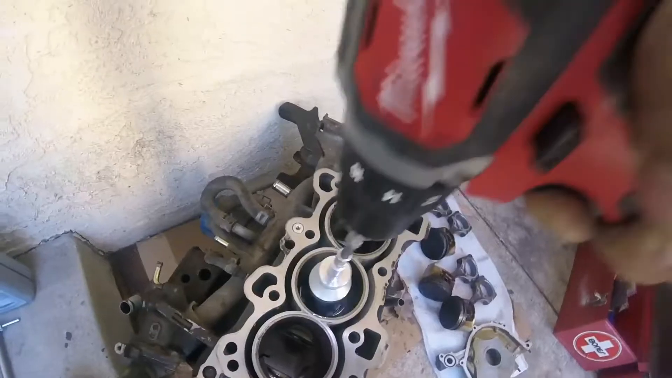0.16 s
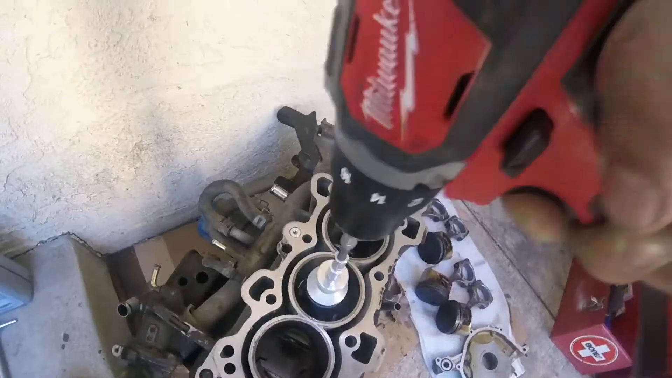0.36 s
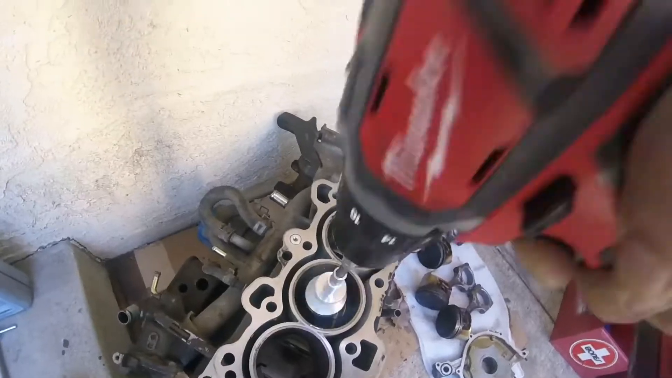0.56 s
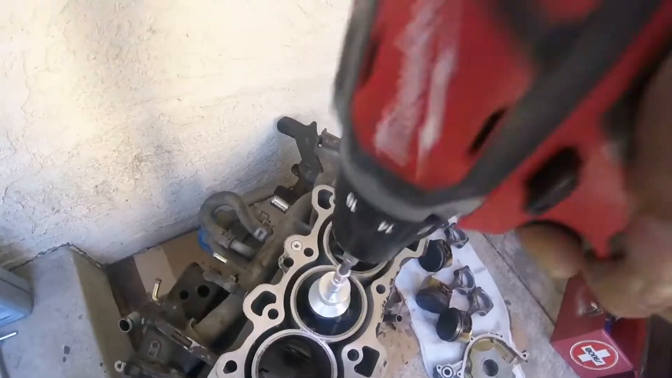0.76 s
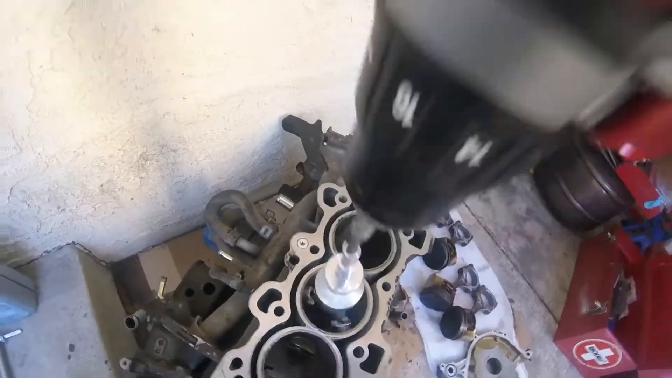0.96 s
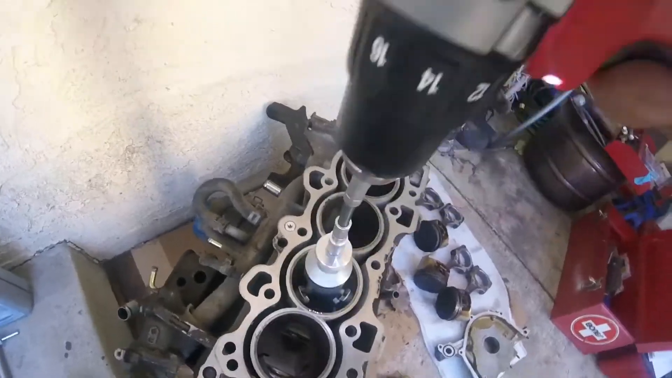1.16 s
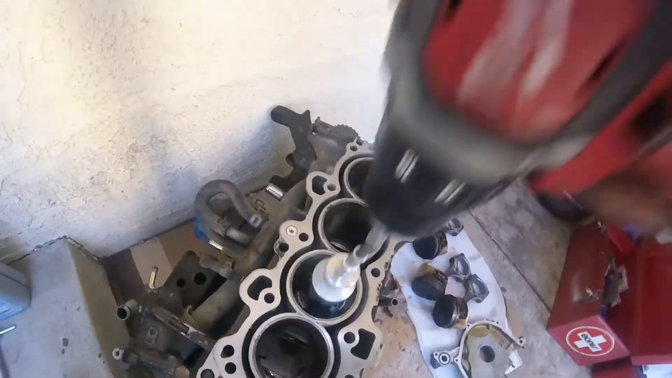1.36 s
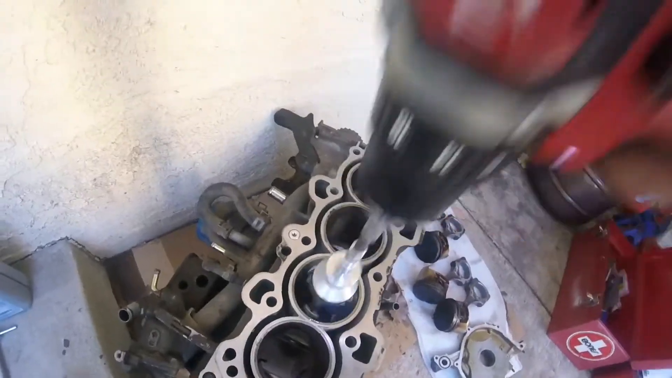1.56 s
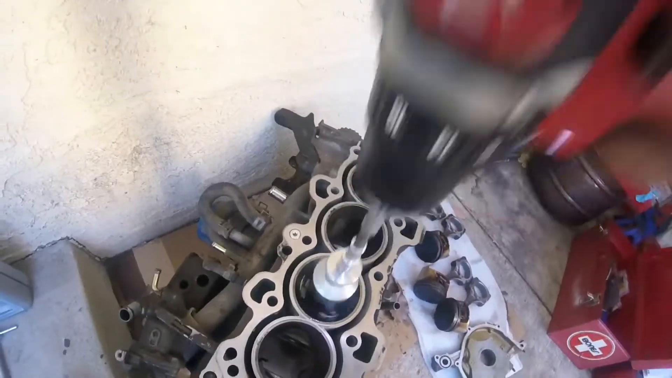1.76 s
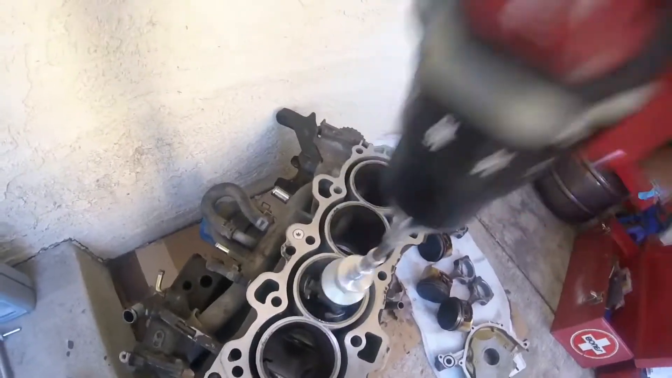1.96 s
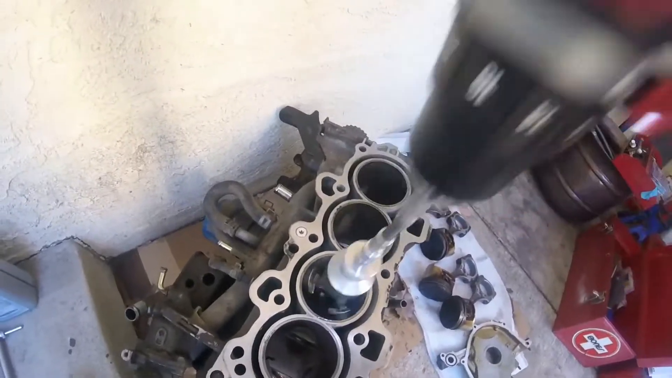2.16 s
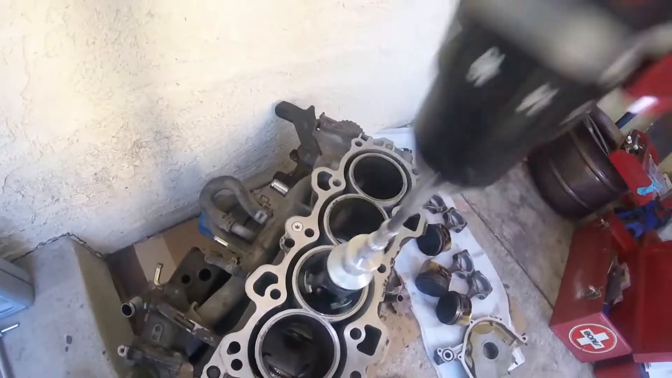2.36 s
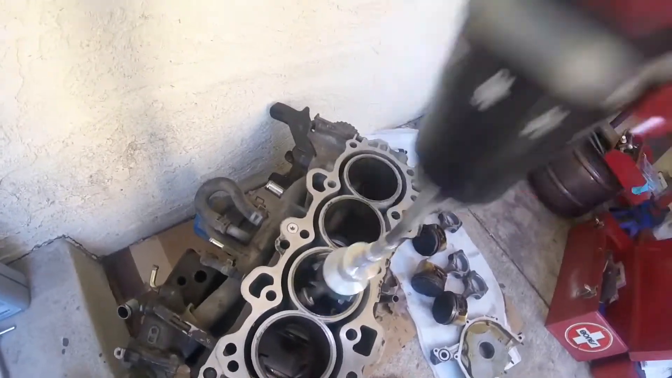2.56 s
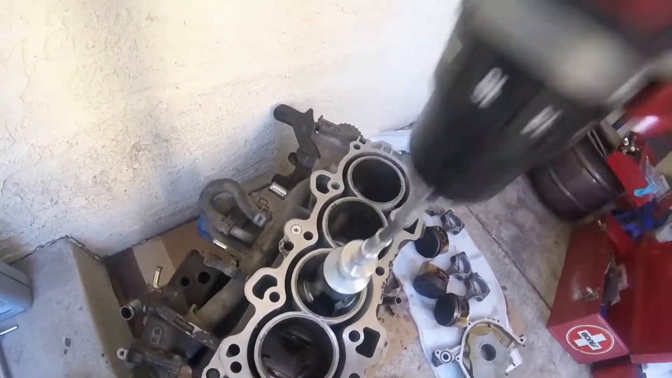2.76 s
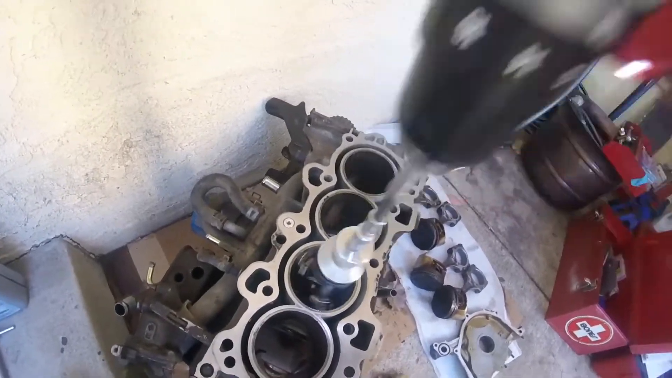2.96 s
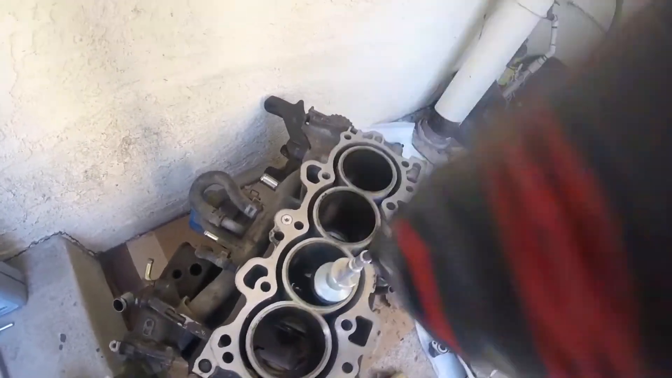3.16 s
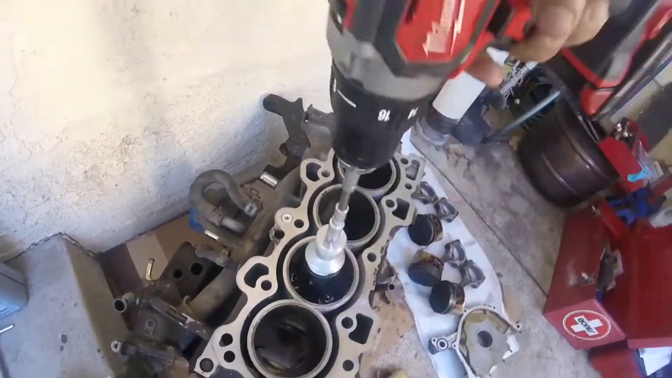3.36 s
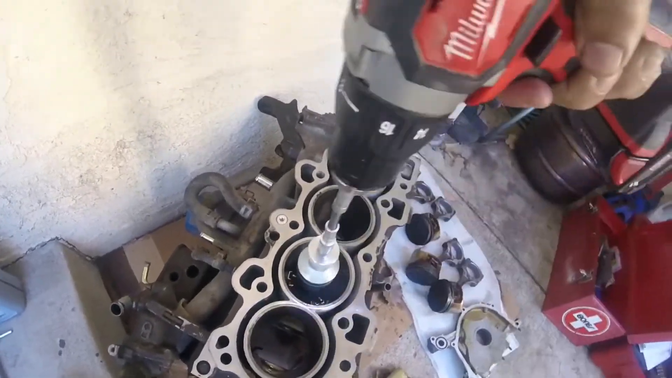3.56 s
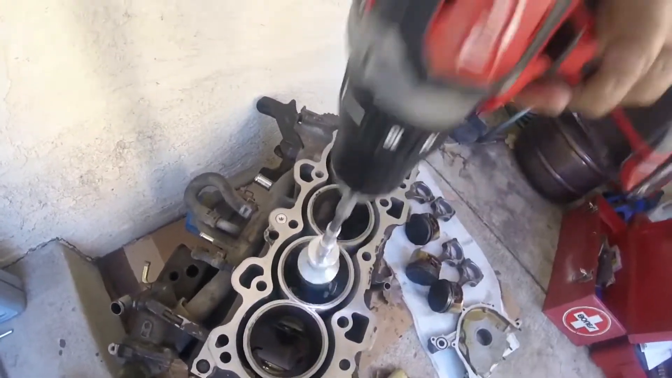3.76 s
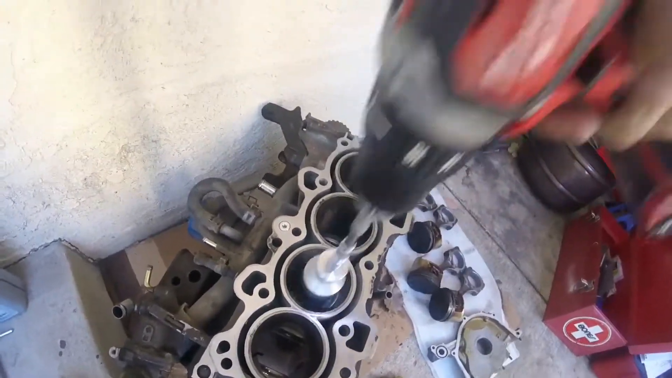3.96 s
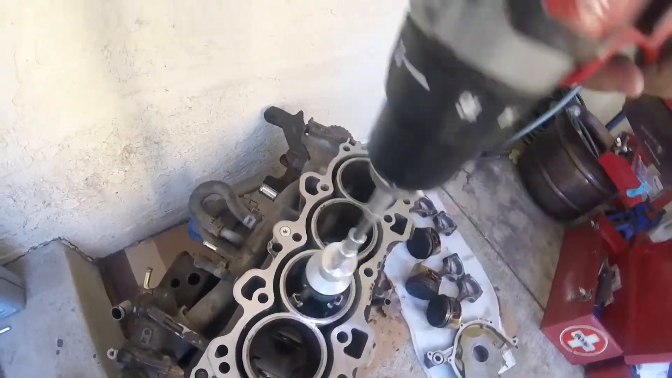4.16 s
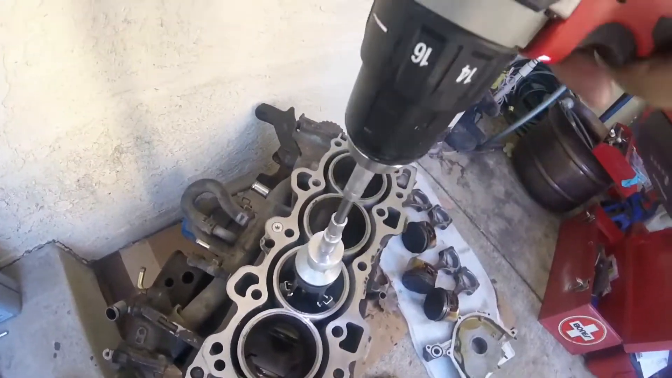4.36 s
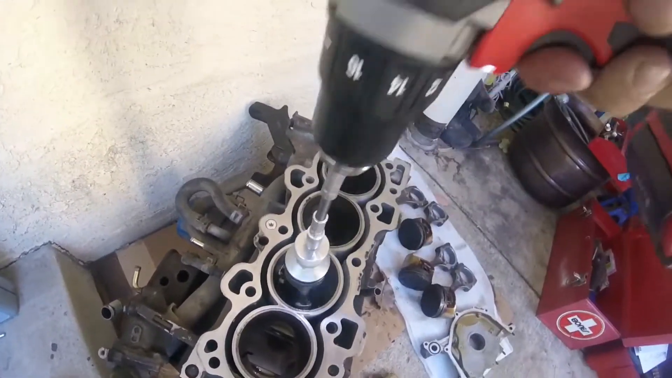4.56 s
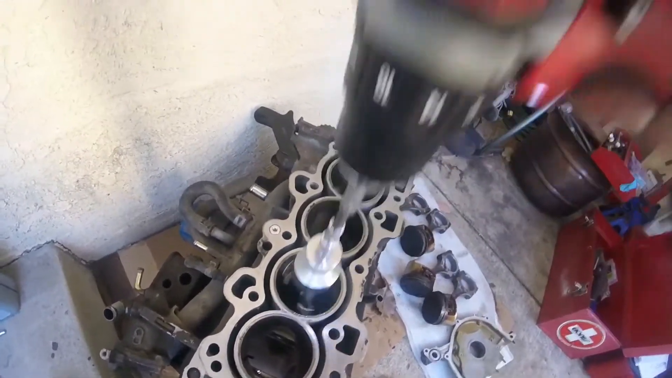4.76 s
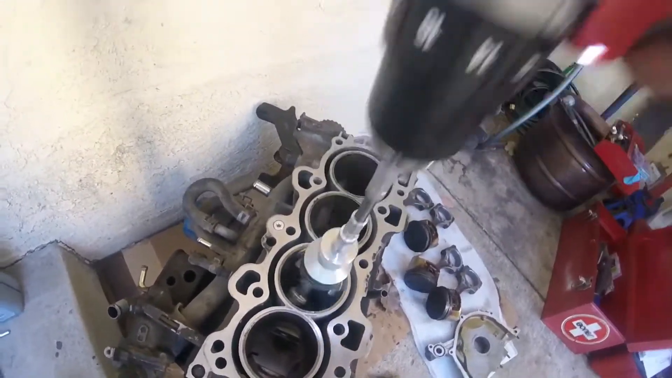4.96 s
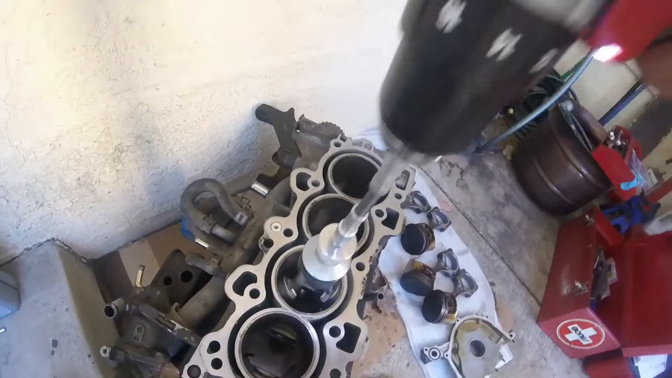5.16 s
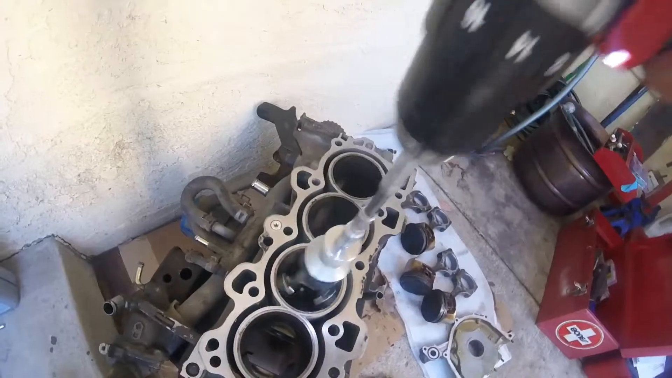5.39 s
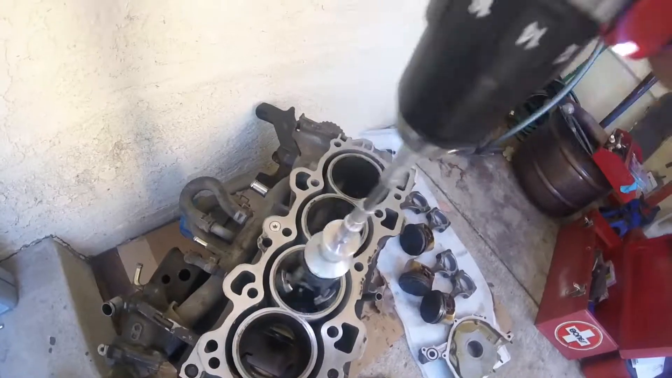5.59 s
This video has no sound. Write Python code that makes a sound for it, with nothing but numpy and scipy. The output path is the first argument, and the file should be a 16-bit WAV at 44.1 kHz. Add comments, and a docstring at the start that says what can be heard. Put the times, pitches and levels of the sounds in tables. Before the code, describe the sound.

A cordless drill is already running, close to the microphone in a workshop with little echo, spinning a hone inside an engine cylinder. Its whine wavers in pitch about five times a second with the strokes, along with pulsing gear rattle and the gritty scrape of stones on metal. Just before 1 second, steel clacks and the motor cuts out for an instant. It restarts at 1.2 seconds, knocks sharply at 1.4, and keeps working until it stops with a clack around 3.1. The hone slides and knocks in the bore with a short metallic ring. From 3.6 seconds the drill turns slower and lower, and the engine block hums briefly, ending in more clacks at 4.1. After a quiet half second, the drill returns to full speed at 4.6 and runs until the end, around 5.6. Low handling rumble and faint room tone continue underneath.

```python
"""A cordless drill spins a hone up and down an engine cylinder, close to the microphone in a workshop.
The gears whine and rattle as the speed swings with each stroke, and the stones scrape the bore.
The trigger is let go three times: the drive stops with a clack and the hone knocks in the cylinder.
Underneath, the block hums and the hand-held drill rumbles over faint room tone; the walls are near."""
import sys
import numpy as np
from scipy import signal
from scipy.fft import rfft, irfft, next_fast_len
from scipy.io import wavfile
from scipy.ndimage import map_coordinates

SR = 44100
rng = np.random.default_rng(int(sys.argv[2]) if len(sys.argv) > 2 else 0)


def unload_audio(sound):
    """Save the sound as a 16-bit wav file, at the path given as the first command line argument."""
    columns = np.transpose(np.atleast_2d(sound))
    # keep every value between -1 and 1, then stretch to whole-number steps
    steps = np.round(np.clip(columns, -1, 1) * 32767)
    wavfile.write(sys.argv[1], SR, steps.astype(np.int16))


N = 248150
TIME = np.arange(N) / SR

# strokes of the hone, from the free-running moment on; shaft speeds hold for a full trigger:
# start_s, free_turns_per_s, biting_turns_per_s, drive_db, rattle_db, scrape_db
STROKES = [(-0.18, 158, 128, -23, -30, -31), (0.05, 170, 118, -38, -28.5, -33),
           (0.265, 157, 119, -38, -31, -30), (0.485, 159, 113.6, -37, -27, -31.5),
           (0.7, 136, 112, -39.5, -32.5, -30), (0.895, 149, 130, -37, -27.5, -31),
           (0.985, 135, 128, -39.5, -29.5, -33), (1.225, 128, 138, -35.5, -30.5, -29),
           (1.306, 135, 131, -37.5, -45, -33), (1.43, 141, 97.4, -43.5, -36.5, -35.5),
           (1.65, 122, 103, -45.5, -38, -35), (1.84, 134, 109, -42.5, -35, -34.5),
           (2.025, 143, 106.6, -41.5, -32, -34.5), (2.215, 147, 102.5, -43, -31.5, -34),
           (2.415, 134, 100.3, -43.5, -31.5, -33.5), (2.625, 140, 113, -41.5, -30, -33.5),
           (2.82, 155, 128, -40, -32, -32), (3.0, 164, 121, -40, -28.5, -33.5),
           (3.17, 128, 127, -41, -43, -33), (3.769, 112, 110, -49, -42.5, -36.5),
           (3.935, 143, 123, -41.5, -33.5, -32), (4.67, 143, 135, -41.5, -43, -35),
           (4.79, 139, 131.6, -45, -36, -37), (5.01, 132.5, 123, -43, -32.5, -34.5),
           (5.21, 147, 135, -43.5, -31.5, -37), (5.4, 132, 123.5, -42.5, -32, -36),
           (5.62, 132, 128, -43, -27.5, -34.5)]
# spectrum of hard contact in the bore: frequency_hz, gain_db
CONTACT_SPECTRUM = [(1000, -40), (3000, -20), (5000, 2.5), (5900, -3.5), (6900, 1), (7600, -1.5),
                    (8500, -0.5), (9500, 3.5), (10500, 2), (12000, 0), (14000, -9)]


def from_db(db):
    """Decibels to gain."""
    return 10 ** (np.asarray(db) / 20)


def rms_one(x):
    """Scale to unit rms."""
    return x / np.sqrt(np.mean(x ** 2) + 1e-20)


def in_time(rows):
    """Rows of (time_s, values...) as one curve per value, sample by sample."""
    times, *columns = np.transpose(rows)
    return [np.interp(TIME, times, column) for column in columns]


def drift(rate):
    """Smooth random wander with about `rate` new values a second; rms 1."""
    return rms_one(map_coordinates(rng.standard_normal(N // 8), [TIME * rate], order=3, mode="wrap"))


def shaped(x, spectrum):
    """Pass x through a response given as rows of (frequency_hz, gain_db)."""
    hz, db = np.transpose(spectrum)
    size = next_fast_len(N)
    bins = np.maximum(np.fft.rfftfreq(size, 1 / SR), 1)
    response = from_db(np.interp(np.log(bins), np.log(hz), db))
    return irfft(rfft(x, size) * response, size)[:N]


def colour(x, spectrum):
    """Give x a spectrum; rms 1."""
    return rms_one(shaped(x, spectrum))


def grains(per_s, spread_db):
    """Random tiny impacts of uneven size; rms 1."""
    sizes = from_db(spread_db * np.minimum(rng.exponential(1, N), 4)) * rng.choice([-1, 1], N)
    return rms_one(sizes * (rng.random(N) < per_s / SR))


def room_tone(level_db):
    """The faint, steady background of the workshop."""
    # spectrum of the quiet room: frequency_hz, gain_db
    spectrum = [(20, -18), (60, 5), (300, -7), (500, -19), (800, -13.5), (1300, -10), (2300, -16),
                (12000, -41)]
    return from_db(level_db) * colour(rng.standard_normal(N), spectrum)


def near_walls(x, t60_s):
    """A short diffuse tail from the walls, reaching the microphone 4 ms after the direct sound."""
    age = TIME[:SR // 2]
    tail = rng.standard_normal(len(age)) * from_db(-60 * age / t60_s) * (age > .004)
    return signal.fftconvolve(x, tail / np.linalg.norm(tail))[:N]


def handling_rumble(gain_db, lumpy_db):
    """Low, lumpy shaking of the hand-held drill and the block."""
    # strength of the shaking: time_s, level_db
    handling = [(0, -41), (0.96, -39), (1.35, -39.5), (1.55, -46.5), (1.9, -42), (2.95, -43.5), (3.16, -39),
                (3.5, -40.5), (3.85, -38.5), (4.2, -50.5), (4.6, -45), (5.62, -44.5)]
    # its spectrum: frequency_hz, gain_db
    spectrum = [(15, -46), (28, -3), (42, -6), (55, 3.5), (75, -7.5), (98, -5.5), (145, 0.5), (205, 1.5),
                (245, -12.5), (285, -7.5), (350, -14.5), (700, -19.5), (2000, -44)]
    level = from_db(in_time(handling)[0] + gain_db + lumpy_db * drift(25))
    return level * colour(rng.standard_normal(N), spectrum)


def block_hum():
    """Stone friction sets the low resonances of the engine block going."""
    # the hum rises when the stones drag slowly: time_s, level_db
    drag = [(0, -57), (3.1, -73), (3.5, -56.5), (3.8, -55), (3.97, -44.5), (4.08, -44.5), (4.2, -63),
            (4.6, -65), (5.63, -60)]
    # resonances of the block: frequency_hz, gain_db
    resonances = [(200, -30), (265, -14), (292, -2), (325, -20), (460, -19), (490, -6), (507, 0), (525, -6),
                  (560, -19), (900, -45)]
    return from_db(in_time(drag)[0]) * colour(rng.standard_normal(N), resonances)


def steel_ring(force, shifting_db=5.5):
    """The ring of hone and liner; the modes swell and fade as the contact points move."""
    # modes of the steel hone and cylinder liner: pitch_hz, level_db, t60_s
    modes = [(2750, -6, .035), (4090, -4, .06), (4265, -4, .05), (5020, -5, .04), (5230, -5, .05),
             (6430, -3, .025), (6950, -2, .025), (8310, -2, .045), (8550, -1, .03), (9230, -2, .018),
             (10980, -5, .012)]
    ring = 0
    for hz, db, t60 in modes:
        r, w = from_db(-60 / (t60 * SR)), 2 * np.pi * hz / SR  # pole radius and angle
        push = force * from_db(db + shifting_db * drift(22.01)) * np.sqrt(1 - r * r)
        ring = ring + signal.lfilter([np.sin(w)], [1, -2 * r * np.cos(w), r * r], push + 1e-18)
    return rms_one(ring) * np.std(force)


def knocks(ring_db, rise_s):
    """Loose steel parts chatter for some milliseconds, ring, and thump the drill body."""
    # knocks of chuck and hone: start_s, metal_db, length_s, thud_db
    hits = [(0.934, -39, 0.0086, -29), (0.948, -39, 0.016, -31), (0.968, -25, 0.013, -31),
            (0.9807, -19.5, 0.006, -35), (1.133, -45, 0.0072, -53), (1.193, -52, 0.0059, -50),
            (1.376, -26, 0.005, -24.5), (1.381, -17.5, 0.0045, -44), (1.388, -43, 0.0052, -24),
            (2.949, -30.5, 0.013, -33), (3.135, -28, 0.0092, -47), (3.144, -31, 0.007, -29.5),
            (3.177, -28, 0.0052, -33), (3.19, -54, 0.018, -32.5), (3.275, -31, 0.0046, -45),
            (3.325, -40, 0.004, -30.5), (3.405, -20, 0.0063, -39.5), (3.536, -48, 0.004, -40.5),
            (4.059, -26, 0.0071, -36), (4.063, -31, 0.013, -31), (4.102, -44, 0.0093, -42),
            (4.1056, -22.5, 0.0079, -31.5), (4.115, -32, 0.0064, -31.5), (4.328, -60, 0.0061, -43),
            (4.428, -64, .004, -48)]
    # spectrum of the thumped drill body: frequency_hz, gain_db
    body = [(40, -19), (170, -14.5), (350, -4), (700, -7), (1100, -7), (1600, -6.5), (2300, -9),
            (3000, -6.5), (4500, -12), (12000, -24)]
    bright, dull = np.zeros(N), np.zeros(N)
    for start_s, metal_db, length_s, thud_db in hits:
        age = np.maximum(TIME - start_s, 0)
        burst = (1 - np.exp(-age / rise_s)) * np.exp(-np.minimum(age / length_s, 20) ** 1.7)
        bright += from_db(metal_db) * burst
        dull += from_db(thud_db) * burst
    clack = bright * colour(grains(16000, spread_db=3), CONTACT_SPECTRUM)
    ring = from_db(ring_db) * steel_ring(clack)
    thud = dull * colour(rng.standard_normal(N), body)
    return clack + ring + thud


def stroking(bite_share=.53, longest_bite_s=.125):
    """Each stroke eases from free running to full bite and back: full-trigger speed and load (0-1)."""
    starts, free, biting = np.transpose(STROKES)[:3]
    hardest_bites = starts + np.minimum(bite_share * np.diff(starts, append=np.inf), longest_bite_s)
    steps = np.arange(2 * len(starts))  # even: running free, odd: full bite
    step = np.interp(TIME, np.ravel([starts, hardest_bites], "F"), steps)
    eased = np.floor(step) + np.sin(np.pi / 2 * (step % 1)) ** 2
    speed = np.interp(eased, steps, np.ravel([free, biting], "F"))
    load = np.sin(np.pi / 2 * step) ** 2
    return speed, load


def trigger(load, spin_up_s=.034, brake_s=.022, overtone_bite_db=-2):
    """The motor spins up and brakes: running (0-1), share of full speed, pinion and overtone gains."""
    # pulls of the trigger: pressed_s, let_go_s, speed_share, pinion_db, pinion_bite_db, overtone_db
    # (a bite_db is the change from free running to full bite)
    pulls = [(-0.3, 1.022, 1, -6, 5, -0.5), (1.156, 3.152, 1, -5, -0.5, -1),
             (3.628, 4.066, 0.45, -13, 5, -2.5), (4.575, 5.802, 1, -1.2, 0.5, 1)]
    running, throttle, pinion, overtones = 0, 0, 0, 0
    for pressed_s, let_go_s, speed_share, pinion_db, pinion_bite_db, overtone_db in pulls:
        spin_up = (1 - np.exp(-np.maximum(TIME - pressed_s, 0) / spin_up_s)) ** 2
        run = spin_up * np.exp(-np.maximum(TIME - let_go_s, 0) / brake_s)
        running += run
        throttle += speed_share * run
        pinion += run ** 2 * from_db(pinion_db + pinion_bite_db * (load - .5))
        overtones += run ** 2 * from_db(overtone_db + overtone_bite_db * (load - .5))
    return running, throttle, pinion, overtones


def swell(peak_s, width_s):
    """A bell-shaped rise and fall around peak_s."""
    return np.exp(-.5 * np.minimum(np.abs(TIME - peak_s) / width_s, 10) ** 2)


def honing_gains(running, load, growl_bite_db=1, scrape_bite_db=-1, rattle_lag_s=.027):
    """Gains of the drive, its growl, the tooth rattle and the stone scrape, from strokes and slides."""
    # the hone slides in the bore with the trigger let go: peak_s, width_s, scrape_db, rattle_db
    slides = [(1.06, 0.024, -48, -39), (1.145, 0.019, -46, -36), (3.194, 0.02, -38.5, -37.5),
              (3.297, 0.019, -35.5, -53), (3.356, 0.014, -55, -67), (3.428, 0.028, -42.5, -48),
              (3.556, 0.04, -50, -57), (4.162, 0.044, -40.5, -45), (4.38, 0.045, -62, -60),
              (4.558, 0.043, -59, -64)]
    _, _, drive_db, _, scrape_db = in_time(STROKES)
    drive = running * from_db(drive_db)
    sliding = sum(from_db(db) * swell(s, width) for s, width, db, _ in slides)
    growl = drive * from_db(growl_bite_db * (load - .5))
    growl += from_db(-11) * sliding  # part of each slide reaches the gearbox
    # the unloaded gears rattle just after the top speed
    unloaded = sum(from_db(db) * swell(s + rattle_lag_s, width_s=.038) for s, _, _, _, db, _ in STROKES)
    rattle = running * unloaded + sum(from_db(db) * swell(s, width) for s, width, _, db in slides)
    scrape = running * from_db(scrape_db + scrape_bite_db * load) + sliding
    return drive, growl, rattle, scrape


def shaft_turns(speed, shake):
    """Angle of the motor shaft in turns; the dragging stones shake the speed."""
    return np.cumsum(speed * (1 + shake * drift(90))) / SR


def tooth_chatter(turns, regular, wander_rate, highest_order=90):
    """Tooth errors repeat every turn and shift as the planets orbit; when slow, loose impacts take over."""
    errors = signal.resample(rng.standard_normal((3, 2 * highest_order)), 20 * highest_order, axis=1)
    loads = np.array([drift(wander_rate) for planet in errors])
    loads = loads / np.linalg.norm(loads, axis=0)  # three planet gears share one load
    one_turn = np.linspace(0, 1, errors.shape[1])
    repeated = sum(load * np.interp(turns % 1, one_turn, error) for load, error in zip(loads, errors))
    speed = np.gradient(turns) * SR
    share = regular * np.clip(speed / 55 - 1, 0, 1)
    # the loose impacts spread over a wider band, so they need more power to be as loud
    loose = 2.2 * grains(9000, spread_db=4.5)
    return np.sqrt(share) * rms_one(repeated) + np.sqrt(1 - share) * loose


def stones(turns, scrape, rattle, scrape_db, ripple_db, ring_db, judder_db):
    """Grit drags over the bore, jerked along by the gear teeth; the steel rings as the drive rattles."""
    grip = grains(14000, spread_db=3)
    grip += from_db(ripple_db) * tooth_chatter(turns, regular=.9, wander_rate=45)
    friction = scrape * from_db(scrape_db + judder_db * drift(260)) * colour(grip, CONTACT_SPECTRUM)
    taps = grains(2500, spread_db=3)
    return friction + steel_ring(rattle * from_db(ring_db) * taps)


def gearbox(turns, growl, rattle, growl_db, rattle_db):
    """Chatter sounds through the housing as a dull growl and a bright rattle that swells once a stroke."""
    # the housing's dull response: frequency_hz, gain_db
    growl_spectrum = [(150, 0), (285, 0.5), (340, -3), (480, -3.5), (570, -3.5), (800, -5.5), (1200, -3.5),
                      (1550, 0), (1920, 6.5), (2400, -1.5), (2850, 5), (3600, 2.5), (6000, -19)]
    # its bright response: frequency_hz, gain_db
    rattle_spectrum = [(1500, -41), (2450, -10), (2800, -50), (3300, -1.5), (4200, 14), (5000, 8),
                       (5700, 7.5), (8000, 1.5), (12000, -10)]
    dull = colour(tooth_chatter(turns, regular=.47, wander_rate=45), growl_spectrum)
    bright = colour(tooth_chatter(turns, regular=.29, wander_rate=40), rattle_spectrum)
    return growl * from_db(growl_db) * dull + rattle * from_db(rattle_db) * bright


def whine(turns, pinion, overtones, pinion_db, overtone_db, pinion_teeth=9, gear_play_turns=.0027):
    """The pinion's meshing tone and the overtones of gears and motor, each fluttering with the load."""
    # overtones of the drive: cycles_per_turn
    orders = [8, 16, 18, 24, 26.5, 27, 32, 36, 48, 54, 72, 80, 104]
    # their strengths: level_db
    order_levels = [-12, -12.5, -8.5, -13, -5.5, -2.5, -10.5, -4.5, -2.5, 0, 0, -3, 1]
    # how the plastic housing radiates the tones: frequency_hz, gain_db
    housing = [(500, -8), (900, -6.5), (1080, -3), (1350, -8.5), (1720, 2), (2300, -6), (2550, 0.5),
               (2730, 5.5), (2950, 3), (3400, 0), (4200, 0.5), (5200, -15), (7000, -19), (11000, -4)]
    flutter_db = 1.8 * drift(220) + 1.2 * drift(15)
    mesh = pinion * from_db(pinion_db + flutter_db) * np.sin(2 * np.pi * pinion_teeth * turns)
    partials = 0
    for order, db in zip(orders, order_levels):
        angle = turns + gear_play_turns * drift(240)  # play in the gears blurs the high orders most
        rasp_db = 1.8 * drift(450)
        breakup_db = 4.5 * drift(35)  # overtones swell and break off as the gears shift
        tone = np.sin(2 * np.pi * (order * angle + rng.random()))
        partials += from_db(db + rasp_db + breakup_db) * tone
    return np.sqrt(2) * shaped(mesh + overtones * from_db(overtone_db) * partials, housing)


def scene():
    """Drill and hone close up, the workshop behind them, alike in both channels."""
    speed, load = stroking()
    running, throttle, pinion, overtones = trigger(load)
    drive, growl, rattle, scrape = honing_gains(running, load)
    turns = shaft_turns(throttle * speed, shake=.002)
    tool = whine(turns, drive * pinion, drive * overtones, pinion_db=5.5, overtone_db=-2)
    tool += gearbox(turns, growl, rattle, growl_db=1, rattle_db=-2)
    tool += stones(turns, scrape, rattle, scrape_db=-.17, ripple_db=-7.5, ring_db=-3, judder_db=.82)
    tool += knocks(ring_db=-4.5, rise_s=.00047) + block_hum()
    room = room_tone(level_db=-55.5) + from_db(-13.5) * near_walls(tool, t60_s=.08)
    mono = tool + room + handling_rumble(gain_db=-1, lumpy_db=1.9)
    return np.array([mono, mono])


def record(dry, cutoff_hz=11950):
    """The top of the treble is cut steeply."""
    return signal.sosfilt(signal.ellip(12, .1, 80, cutoff_hz, fs=SR, output="sos"), dry)


dry = scene()
out = record(dry)
unload_audio(out)
```